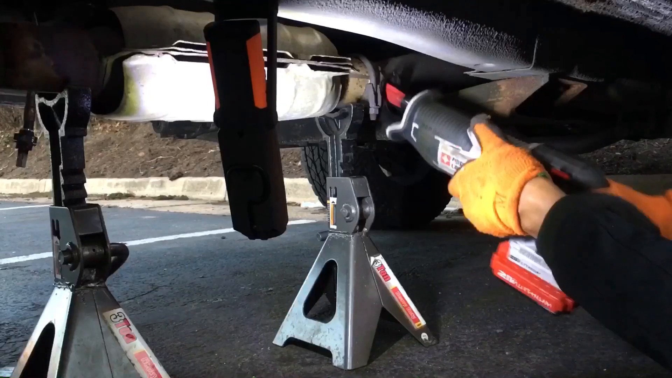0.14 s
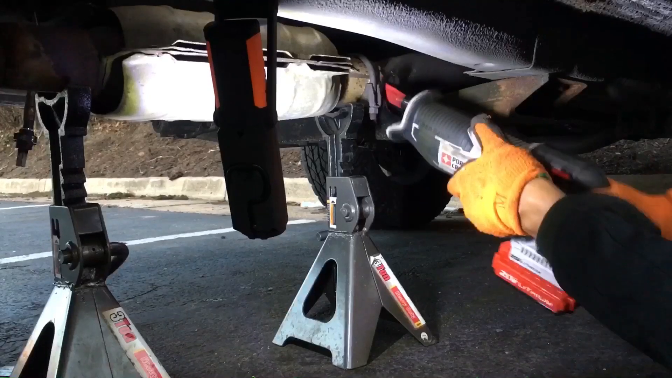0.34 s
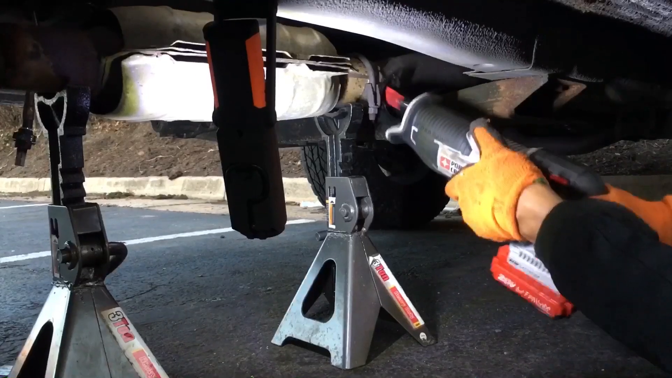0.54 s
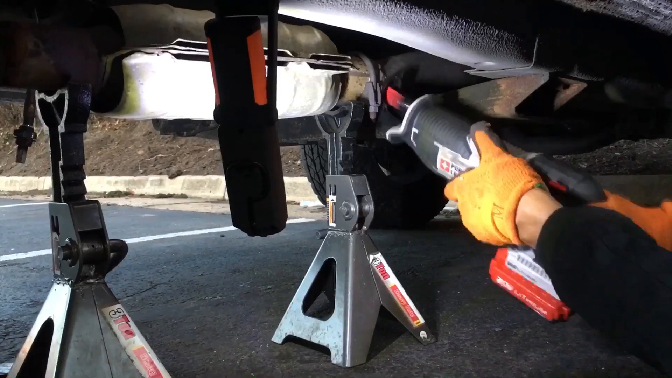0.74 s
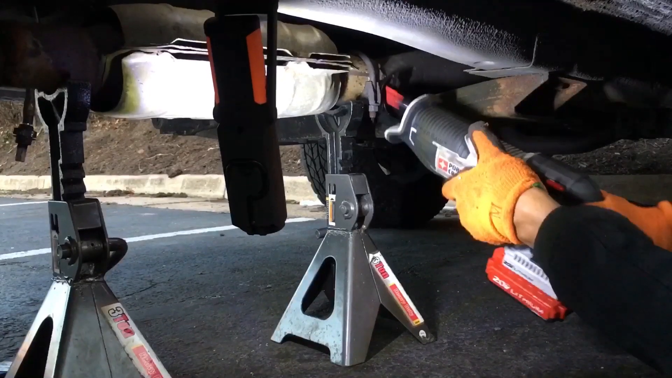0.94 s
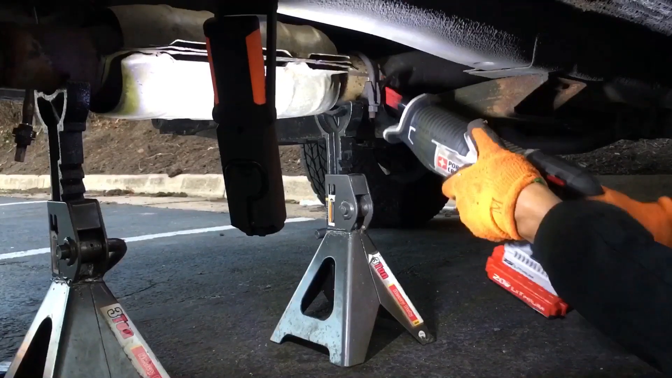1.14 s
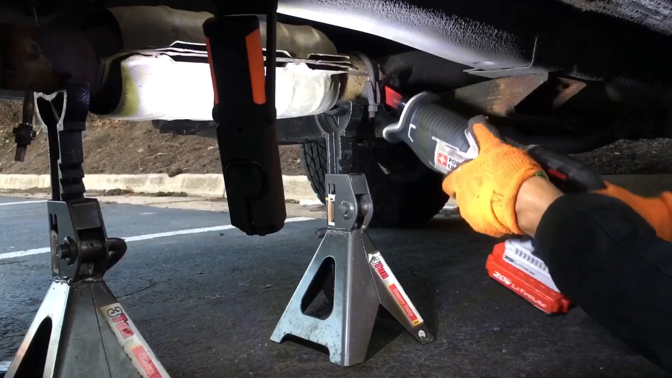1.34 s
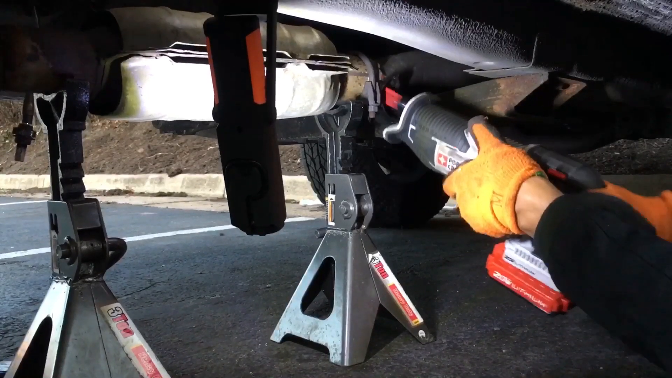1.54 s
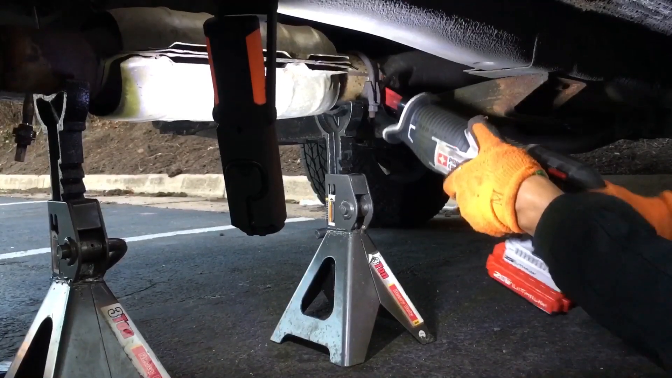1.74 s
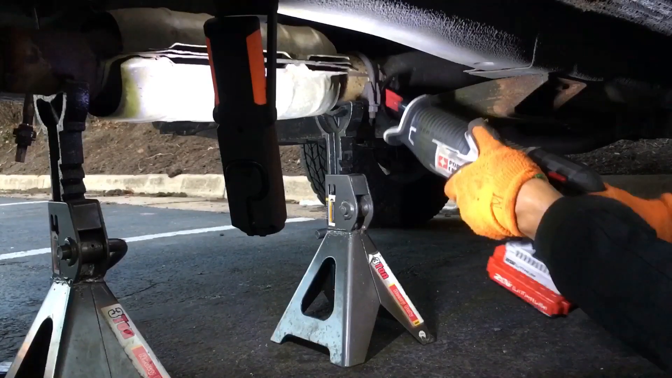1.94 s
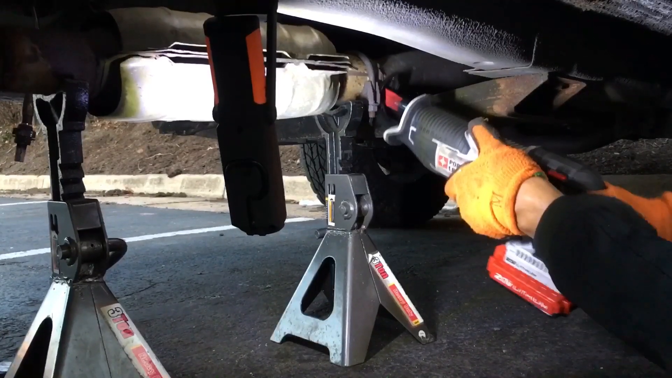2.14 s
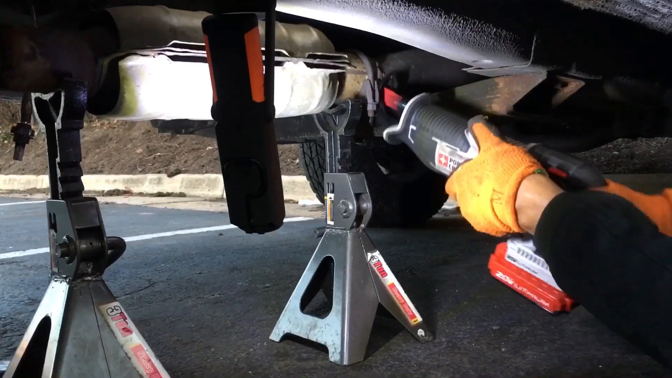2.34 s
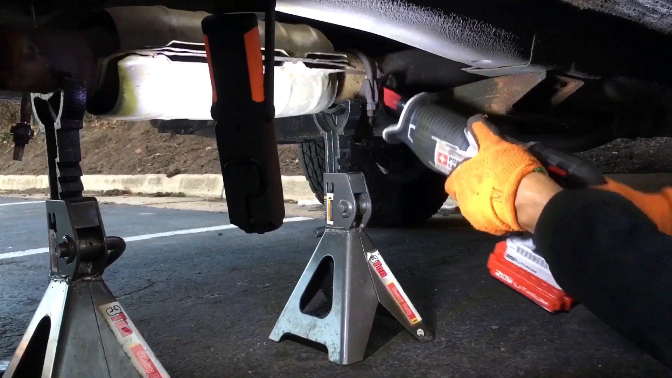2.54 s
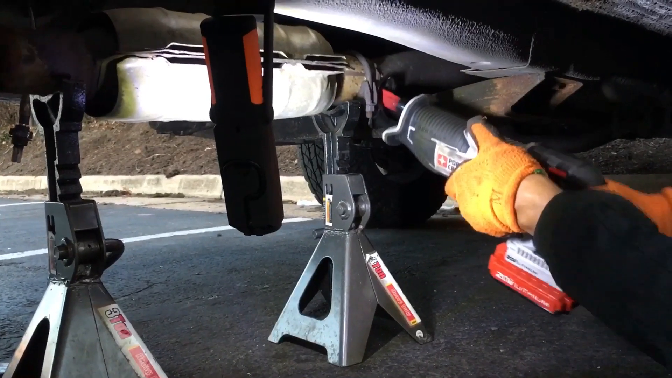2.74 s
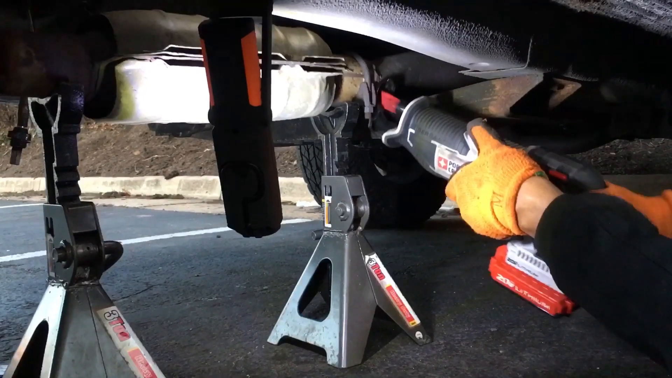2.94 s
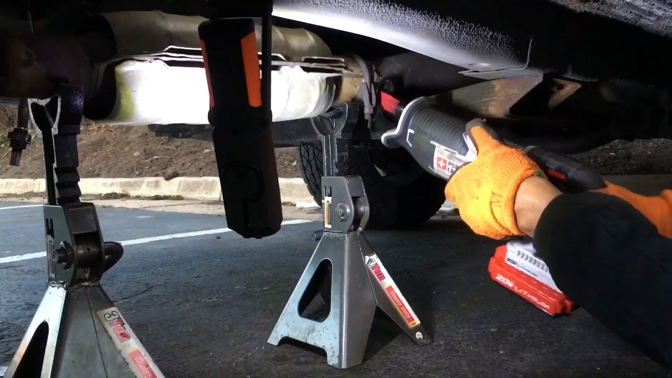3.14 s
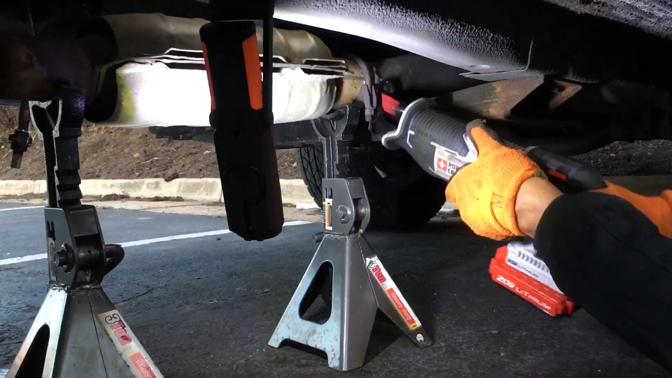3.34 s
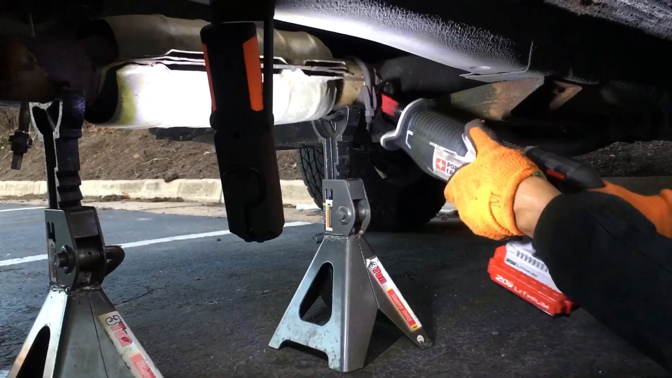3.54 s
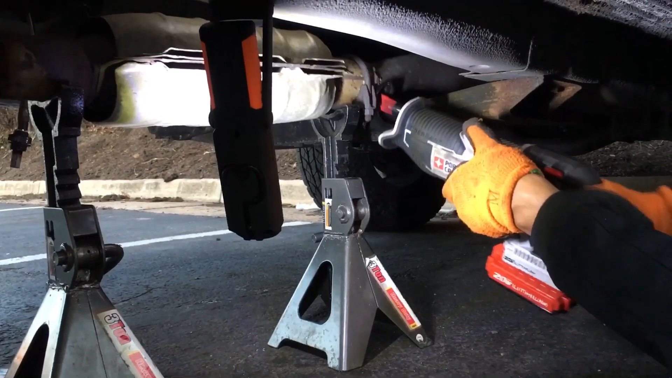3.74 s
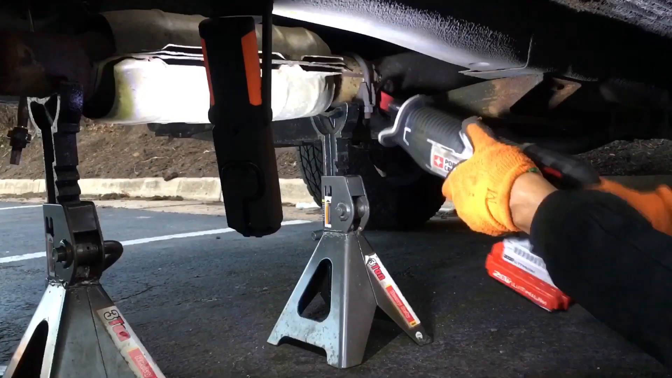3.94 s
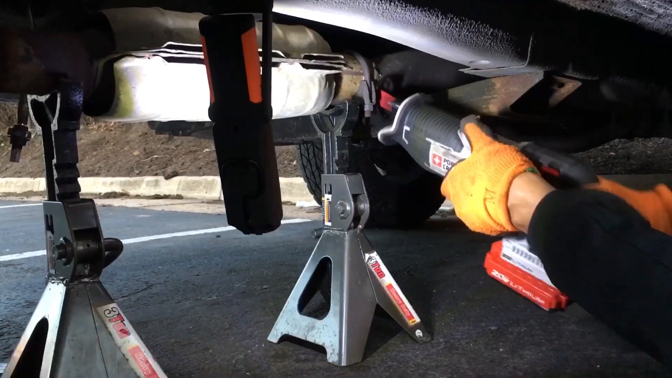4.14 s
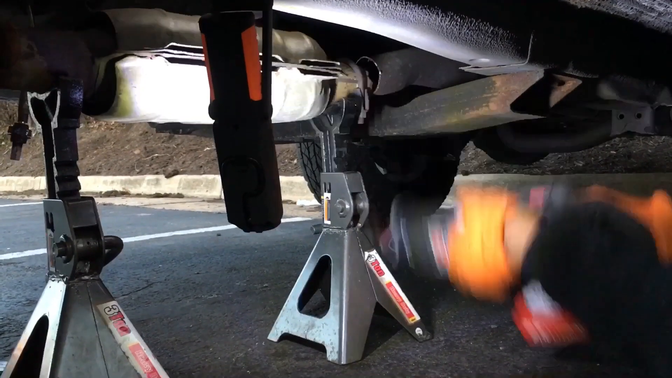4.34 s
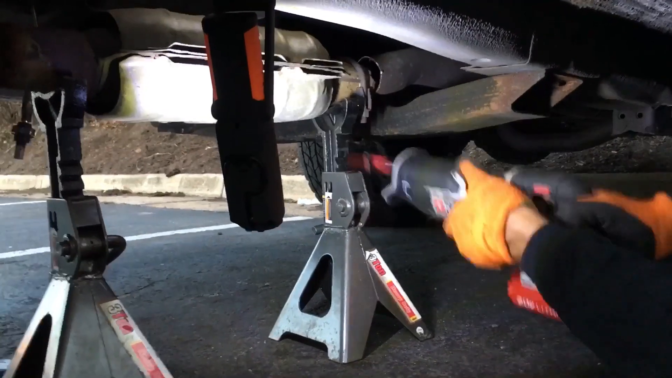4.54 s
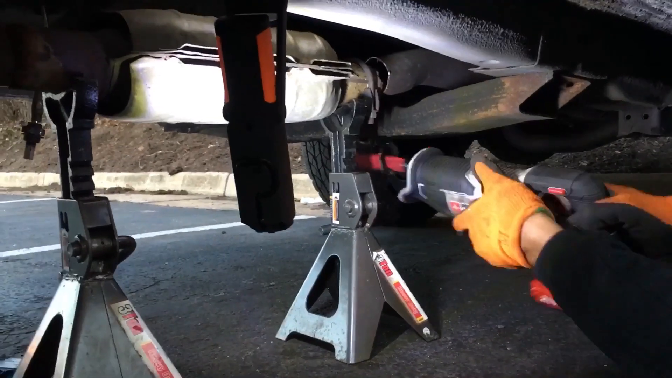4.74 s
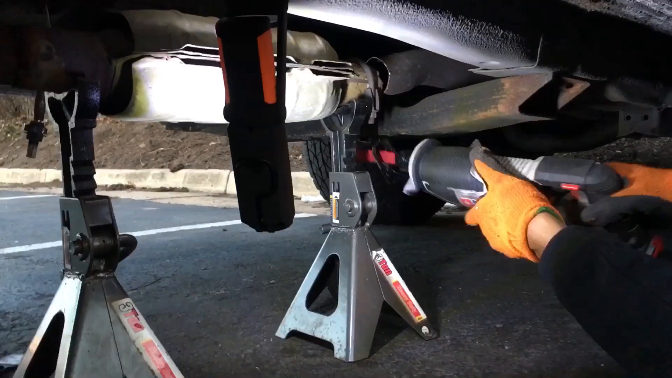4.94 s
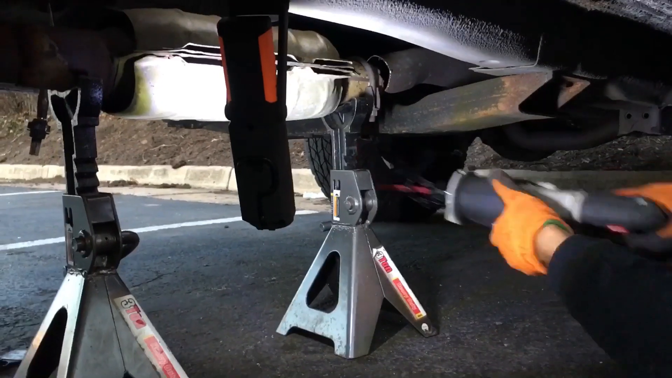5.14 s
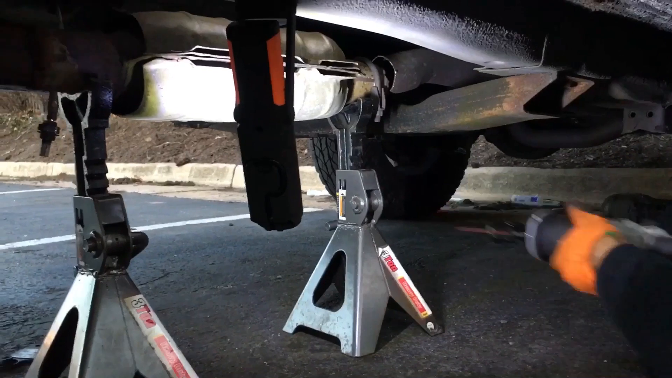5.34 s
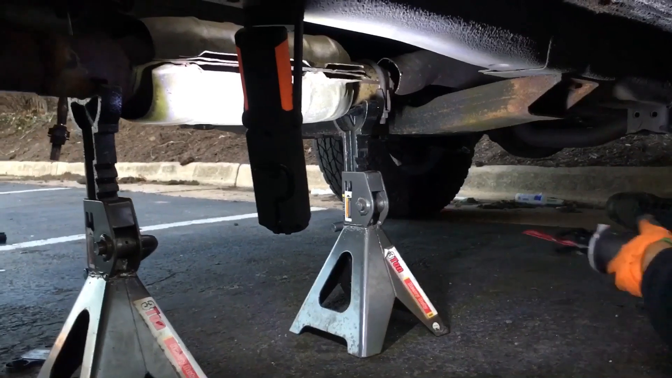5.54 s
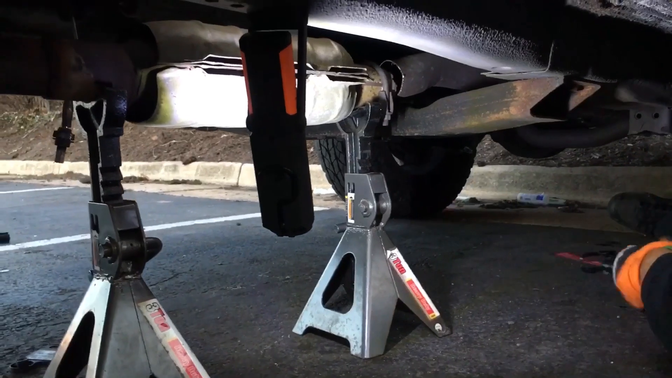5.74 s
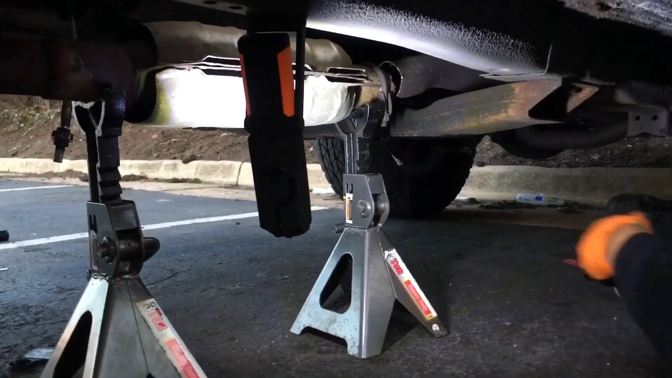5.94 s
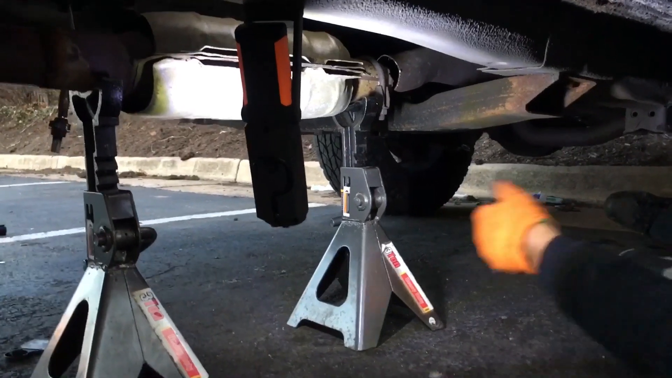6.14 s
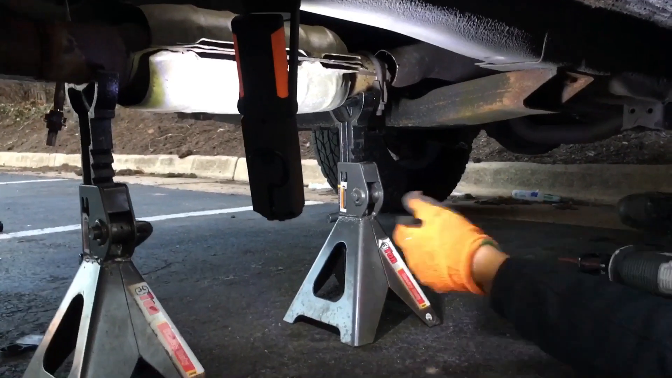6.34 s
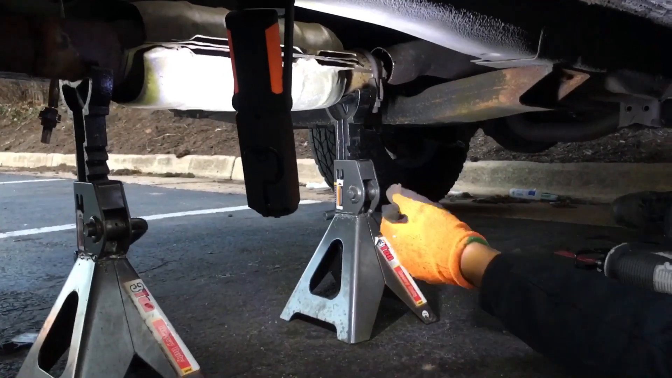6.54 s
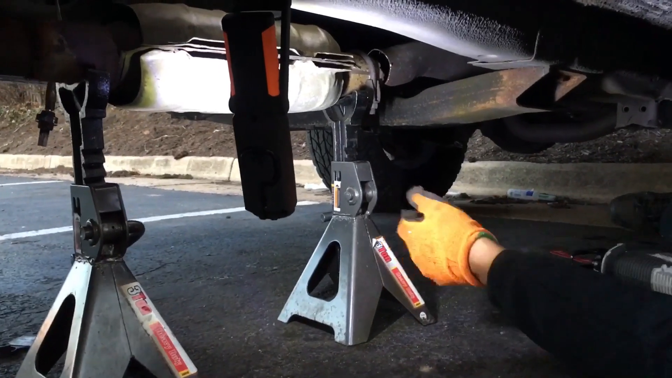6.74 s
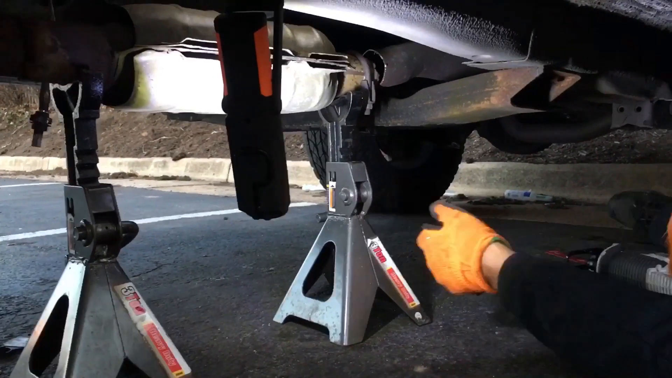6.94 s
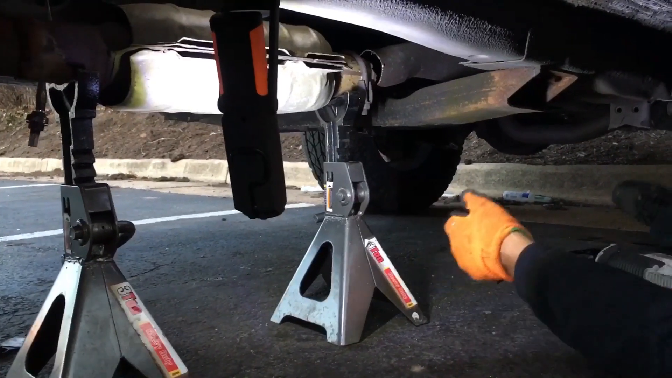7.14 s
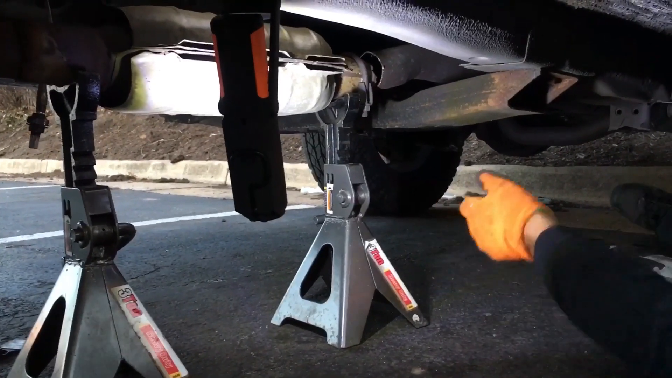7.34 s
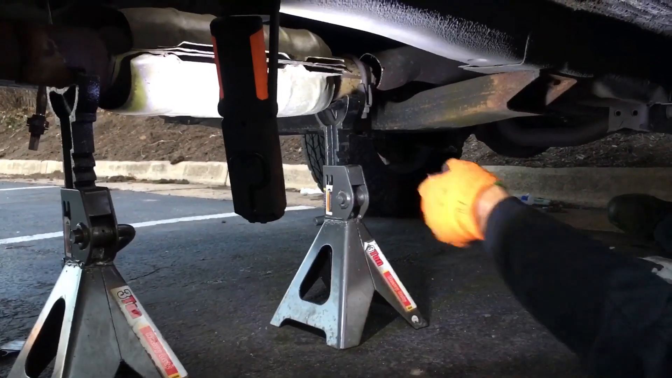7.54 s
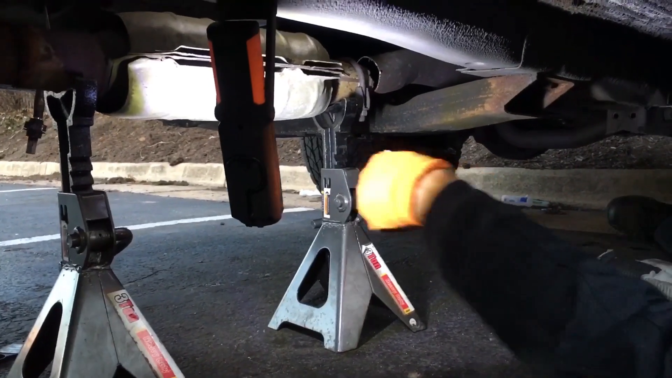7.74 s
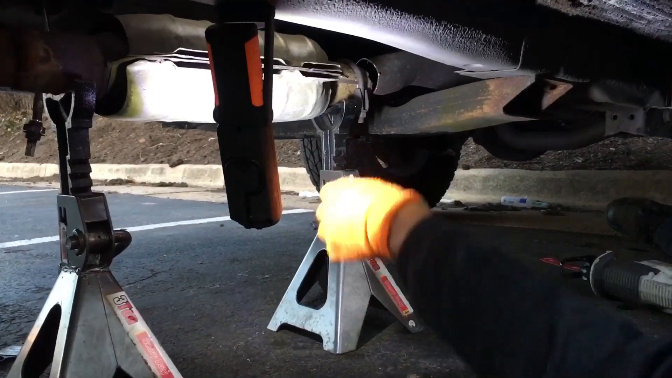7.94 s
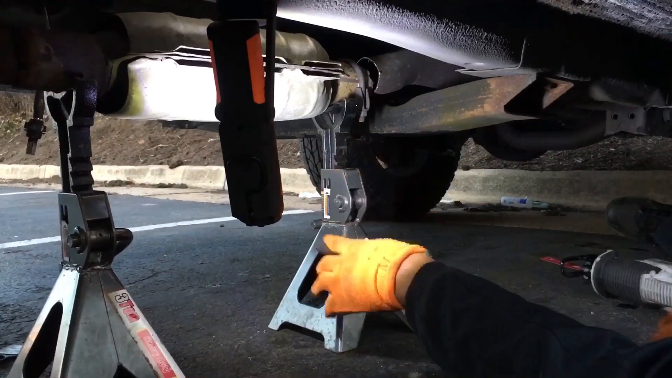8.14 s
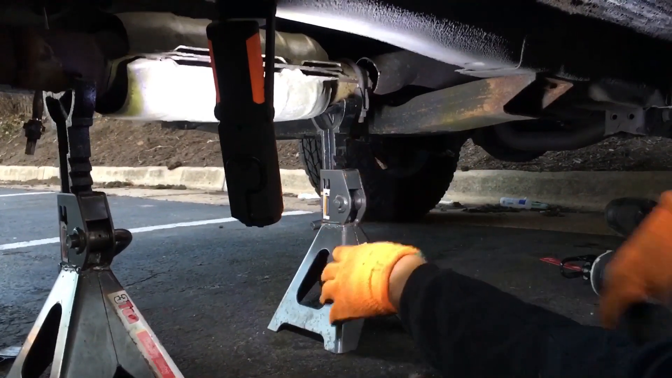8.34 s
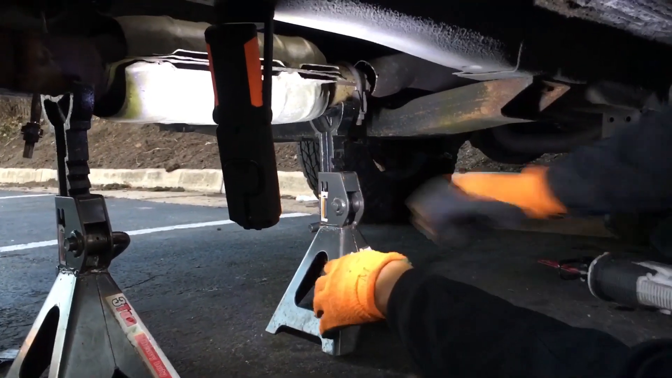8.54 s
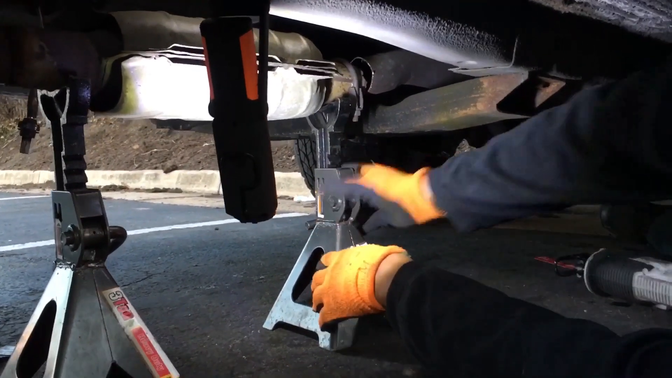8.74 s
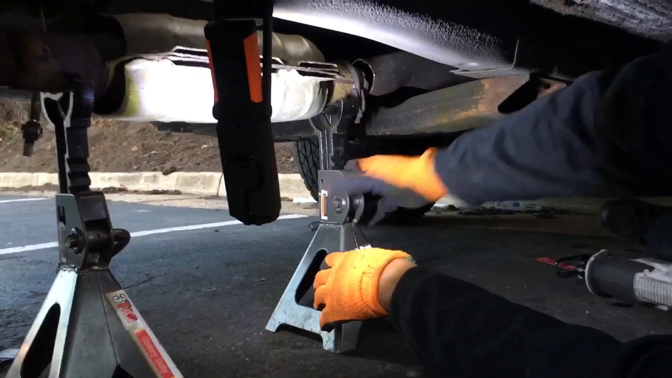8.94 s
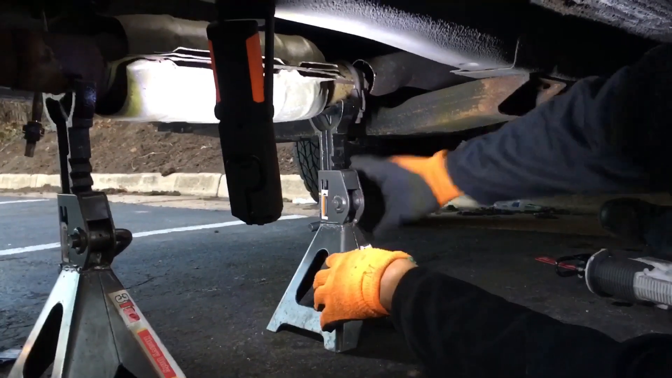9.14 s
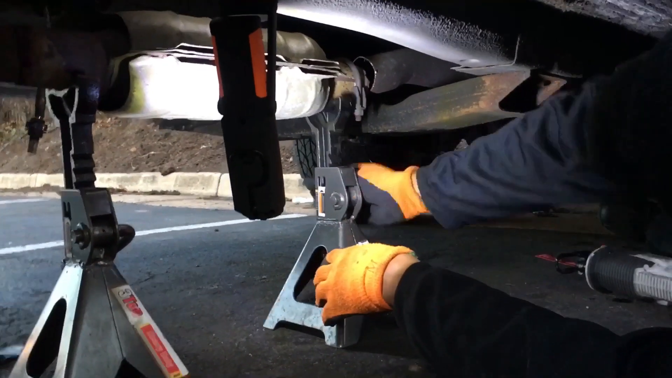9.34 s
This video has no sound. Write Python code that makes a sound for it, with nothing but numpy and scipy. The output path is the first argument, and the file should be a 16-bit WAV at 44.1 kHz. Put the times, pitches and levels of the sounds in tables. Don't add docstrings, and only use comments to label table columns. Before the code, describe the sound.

From 0 to about 4.3 seconds a cordless reciprocating saw cuts a steel pipe close by, around 33 strokes a second: a harsh pulsing rasp, with the pipe wall ringing in wavering mid-high tones. A brief squeal comes near 0.5, and the singing chatter grows fiercer from 2 to 4. At 4.3 the blade breaks through with a knock; the saw runs free with a rattling gear whirr, winding down and stopping at 5.0. Low traffic rumble and a slow engine throb become clearer. Near 5.9 the saw thuds and clatters on asphalt, its blade ringing brightly. From 6 to 9 seconds come sleeve and glove scuffs, a sharp tick at 6.6, smaller ticks, a grit snap at 7.35 and a low bump at 7.8. At 9.3 to 9.5 a steel stand scrapes and clanks several times, the last blow hardest, ringing briefly under the car before the rumble continues.

```python
import sys
import numpy as np
from scipy import signal
from scipy.fft import rfft, irfft, next_fast_len
from scipy.io import wavfile
from scipy.ndimage import uniform_filter1d, map_coordinates

SR = 44100
rng = np.random.default_rng(int(sys.argv[2]) if len(sys.argv) > 2 else 0)


def wav_out(sig):
    wavfile.write(sys.argv[1], SR, np.round(np.clip(np.atleast_2d(sig).T, -1, 1) * 32767).astype(np.int16))


def how_loud(loudness_db):
    steps = np.asarray(loudness_db, float) / 20
    return 10 ** steps


N = 418068
TIME = np.arange(N) / SR


def unit(x):
    return x / np.sqrt(np.mean(x ** 2) + 1e-20)


def along(points, hz):
    f, v = np.transpose(points)
    return np.interp(np.log(hz + 1), np.log(f + 1), v)


def curves(rows):
    s, *cols = np.transpose(rows)
    return [np.interp(TIME, s, c) for c in cols]


def during(rows):
    inside_s = np.minimum(TIME - rows[0][0], rows[-1][0] - TIME)
    return np.clip(inside_s * 100 + 1, 0, 1)


def wobble(rate):
    return map_coordinates(rng.standard_normal(int(N * rate / SR) + 4), [TIME * rate])


def filtered(x, response):
    m = next_fast_len(len(x) + SR // 2)
    return irfft(rfft(x, m) * response(np.fft.rfftfreq(m, 1 / SR)), m)[:len(x)]


def modes(table):
    def response(f):
        return sum((-1) ** k * how_loud(db) * 1j * f * width / (hz * hz - f * f + 1j * f * width)
                   for k, (hz, width, db) in enumerate(table))
    return response


def coloured(x, spectrum):
    return unit(filtered(x, lambda hz: how_loud(along(spectrum, hz))))


def grit(spread_db, rate):
    return unit(rng.standard_normal(N) * how_loud(spread_db * wobble(rate)))


def tone(hz):
    return 2 * np.pi * np.cumsum(hz) / SR


def crank_turns():
    # start_s [s], strokes_per_s [1/s]
    strokes = [(0, 29), (.15, 30.7), (.3, 32), (.7, 33.1), (1.0, 34.4), (1.17, 34), (1.26, 32.6),
               (1.85, 32.09), (2.05, 34.71), (2.5, 33.5), (2.9, 34.55), (3.3, 35.36), (3.62, 34.63),
               (3.85, 29.62), (4.0, 27.64), (4.15, 32.64), (4.35, 31.02)]
    return np.cumsum(curves(strokes)[0]) / SR + 1.15


def shaking(turns):
    # stroke_multiple [1], level_db [dB]
    shake_orders = [(4, -11), (5, -4.5), (6, 0), (7, -12), (8, -13)]
    shake_span = [(0,), (4.33,)]
    # drop when pinned [dB], then sag [dB per s]
    pinned_db, sag_db_per_s = (-5, -2, -5), (-6, -1, -1.5)
    since = TIME - 2
    pinned = np.clip(since / .1, 0, 1)
    second_db, third_db, higher_db = [
        db + pinned * (drop + sag * since) + .8 * wobble(3)
        for db, drop, sag in zip((-28, -35, -30.5), pinned_db, sag_db_per_s)]
    higher = sum(how_loud(db + 2 * wobble(9)) * np.sin(2 * np.pi * k * turns + .5 * wobble(14))
                 for k, db in shake_orders)
    shake = how_loud(second_db - 2.0) * np.sin(4 * np.pi * turns)
    shake += how_loud(third_db - 0.5) * np.sin(6 * np.pi * turns)
    shake += how_loud(higher_db - 1) * higher
    return during(shake_span) * shake


def rasp_sound(press, teeth, bite):
    # pitch_hz [Hz], level_db [dB per Hz]
    scrape_spectrum = [(150, -55), (250, -30.5), (576, -35), (662, -22.5), (1140, -12), (1280, -8.5),
                       (1450, -7.5), (2200, -14), (2860, -15.5), (6140, -24.5), (16000, -31)]
    # pitch_hz [Hz], width_hz [Hz], level_db [dB]
    wall_modes = [(668.4, 26, -2.5), (796, 6.7, -20), (1040, 34, -12.5), (1760, 10, -29.5),
                  (1796, 40, -8.5), (2926, 83, -3.5), (3260, 25, -12.5), (4340, 22.1, -12.5),
                  (5370, 100, -7.5), (5720, 140, 1.5), (6310, 170, 2.5), (8450, 510, -1.5)]
    # pitch_hz [Hz], width_hz [Hz], level_db [dB], fade_start_s [s], fade_db_per_s [dB/s]
    uncut_rings = [(1480, 35, 0, .3, 20), (1150, 30, -1, .8, 8), (2008, 24, 6, .6, 6),
                   (2503, 26, -1, 1.5, 8), (2560, 30, 3, 1.6, 8), (2860, 100, 1, .7, 6)]

    wall = 0
    for hz, width, db in wall_modes:
        drift = how_loud(2 * wobble(6))
        wall = wall + how_loud(db) * drift * unit(filtered(teeth, modes([(hz, width, 0)])))
    rings = 0
    for hz, width, db, s, fade in uncut_rings:
        level = how_loud(db - fade * np.maximum(TIME - s, 0) + 1.3 * wobble(10))
        rings = rings + level * unit(filtered(press * teeth, modes([(hz, width, 0)])))
    loose = how_loud(-14 * (bite - 0.64))
    buzz = unit(filtered(rng.standard_normal(N), modes([(306, 113, -3.5), (653, 260, -2.0)])))

    rasp = coloured(teeth, scrape_spectrum) + how_loud(-16.5) * unit(wall)
    rasp += how_loud(-16.0) * rings + loose * how_loud(-18) * buzz
    treble = filtered(rasp, lambda hz: 1 / (1 + (10000 / (hz + 1)) ** 6))
    rasp -= .09 * np.clip(TIME, 0, 5) * treble
    squeal = np.exp(-((TIME - .5) / 0.05) ** 2) * np.sin(tone(3540 + 45 * wobble(90)))
    return rasp + how_loud(-7 + 3 * wobble(120)) * squeal


def locks(rows, rest_db):
    shapes = []
    for s, hold, db, fade in rows:
        building = 451 * np.maximum(s - TIME, 0)
        fading = fade * np.maximum(TIME - s - hold, 0)
        shapes.append(db - building - fading)
    return np.maximum(np.max(shapes, axis=0), rest_db + 0.88 * wobble(11))


def upper_chatter(u, size, bite, press, teeth):
    phase = tone(1419 + 3 * wobble(12) + 8.5 * wobble(90))
    sung = how_loud(.8 * wobble(150)) * press ** .6 * np.sin(phase)
    upper = unit(filtered(sung, modes([(1421, 250, 0)])))
    neighbours = modes([(1492, 35, 0), (1365, 40, -4), (1550, 50, -4),
                        (1673, 20, -1), (1740, 20, -1), (1850, 60, -5)])
    upper += .5 * unit(filtered(teeth, neighbours))
    flare = bite * size * (.07 + np.exp(-((u - .17) / .12) ** 2))
    flare = flare * how_loud(1.2 * wobble(150) + 1.5 * wobble(20))
    octave = flare * np.sin(2 * phase + .5 * wobble(200))
    upper += how_loud(-9) * unit(filtered(octave, modes([(2843, 350, 0)])))
    sum_tone = np.sin(phase + tone(1145 + 35 * wobble(30)) + .6 * wobble(200))
    upper += how_loud(-15) * unit(flare * sum_tone)
    spray = flare * rng.standard_normal(N)
    return upper + how_loud(-14) * unit(filtered(spray, modes([(2430, 130, -1), (3130, 45, 2), (3410, 80, 0)])))


def lower_chatter(u, size, bite):
    swing = 1.25 - bite ** .4 + 2.6 * size * np.exp(-((u - .25) / .17) ** 2)
    sung = swing * how_loud(1.5 * wobble(100)) * np.sin(tone(1150 + 25 * wobble(80)))
    return unit(filtered(sung, modes([(1150, 170, 0)])))


def cutting(turns):
    # start_s [s], rasp_db [dB], bite [0-1, how unevenly a stroke cuts]
    feed = [
        (0, -23.5, 0.45),
        (1.9, -24.5, 0.45),
        (2.3, -26.5, 0.62),
        (3.1, -29, 0.59),
        (3.4, -28, 0.84),
        (4.03, -28, 0.84),
        (4.06, -31, .55),
        (4.335, -33.5, 0.05),
        (4.35, -64, .7),
    ]
    # start_s [s], hold_s [s], level_db [dB], fade_db_per_s [dB/s]
    upper_pushes = [(.12, 0.017, -33.5, 100), (.24, 0.012, -17, 49), (.88, 0.015, -16, 151.5),
                    (1.0, 0.024, -18, 29.5), (1.29, 0.015, -19, 58.5), (1.52, 0.93, -17, 39.5),
                    (2.02, .2, -12.5, 20.5), (2.22, .15, -11, 46.5), (2.39, 0.06, -7, 60),
                    (2.668, 0.092, -8, 249), (2.958, 0.018, -5.5, 205.5), (3.129, 0.012, -5, 73),
                    (3.25, 0.12, -11.5, 17), (3.36, 0.44, -10, 248), (4.043, 0.077, -11, 94),
                    (4.18, 0.12, -16, 900)]
    lower_pushes = [(0, .06, -22.5, 201), (.17, 0.021, -18, 301.5), (.32, 0.066, -23, 53.5),
                    (.45, 0.17, -23.5, 29.5), (1.05, 0.17, -20, 50.5), (1.22, 0.039, -17, 65),
                    (2.02, 0.011, -23, 8), (2.63, 0.0085, -26, 50), (3.4, 0.5, -22.5, 51),
                    (3.8, .22, -13.5, 300), (4.06, .27, -25, 900)]
    cut_span = [(0,), (4.35,)]
    upper_rest_db, lower_rest_db = -26, -28

    u = turns % 1
    size = how_loud(.7 * rng.standard_normal(int(turns[-1]) + 1))[turns.astype(int)]
    return_drag = .3 * np.exp(-((u - .45) / .1) ** 2)
    stroke = (1 - np.exp(-u / .03)) * (np.exp(-u / .33) + return_drag)
    feed_db, bite = curves(feed)
    bite = np.clip(bite, 0, 1)
    upper_db = locks(upper_pushes, upper_rest_db)
    lower_db = locks(lower_pushes, lower_rest_db)
    rasp_db = feed_db + 0.14 * (upper_db - upper_rest_db) + 1.01 * wobble(8.15)
    press = 1 - bite + bite * size * stroke / np.mean(stroke)
    press = press / np.sqrt(uniform_filter1d(press ** 2, size=4000))
    teeth = press ** 0.36 * grit(spread_db=1.5, rate=460)

    cut = how_loud(rasp_db + 6.5) * rasp_sound(press, teeth, bite)
    cut += how_loud(upper_db - 6) * upper_chatter(u, size, bite, press, teeth)
    cut += how_loud(lower_db - 3.5) * lower_chatter(u, size, bite)
    return during(cut_span) * cut


def traffic():
    # pitch_hz [Hz], level_db [dB per Hz]
    rumble = [(20, -19.5), (64, -0.5), (116, -11.5), (141, -14.5), (216, -24), (271, -30.5), (307, -26),
              (400, -41.5), (520, -61), (880, -120)]
    hiss = [(120, -4.5), (200, -1.5), (254, -8.5), (465, -11), (836, -9.5), (1350, -14.5), (1740, -14.5),
            (5000, -35.5), (16000, -50.5)]
    # start_s [s], peak_db [dB], half_length_s [s], pitch_hz [Hz]
    thuds = [
        (7.772, -40, 0.0066, 400),
        (4.334, -30, 0.005, 330),
        (5.868, -26.5, 0.0053, 310),
        (4.9, -22, .02, 58),
        (6.628, -28, 0.0051, 840),
        (7.77, -17.5, 0.0014, 120),
        (10, -24, 0.078, 59.7),
        (9.388, -26, 0.028, 58),
        (9.352, -30, 0.016, 293),
    ]
    # start_s [s], pitch_hz [Hz], level_db [dB]
    hum = [(7.9, 290, -72), (8.1, 300, -54), (8.5, 311.4, -63), (8.7, 312, -56), (8.9, 296, -49.5),
           (9.0, 276, -84)]
    sing = [(7.74, 2280, -53), (7.85, 2290, -57.5), (8.1, 2230, -69)]
    squeak = [(8.43, 11900, -95), (8.45, 12600, -73), (8.48, 11950, -76), (8.52, 12800, -81),
              (8.56, 11700, -70), (8.61, 10700, -94)]

    duck_db = -5 * np.clip((5.05 - TIME) / .12, 0, 1)
    out = how_loud(-32 + duck_db + 2.2 * wobble(8)) * coloured(rng.standard_normal(N), rumble)
    out += how_loud(-50 + duck_db + 1.1 * wobble(6)) * coloured(rng.standard_normal(N), hiss)
    throbs = [(5.218 + k * .7045 - .019 * (-1) ** k, -21.5, 0.066, 56.9) for k in range(7)]
    for s, db, half, hz in throbs + thuds:
        late = TIME - s
        out += how_loud(db) * np.exp(-(late / half) ** 2) * np.sin(2 * np.pi * hz * late)
    for rows in (hum, sing, squeak):
        hz, db = curves(rows)
        out += during(rows) * how_loud(db + 3 * wobble(40)) * np.sin(tone(hz) + .6 * wobble(60))
    return out


def free_running():
    # start_s [s], level_db [dB]
    free_level = [(4.3, -18), (4.414, -24), (4.432, -19), (4.466, -23), (4.608, -17), (4.93, -18),
                  (4.958, -17), (5.004, -62), (5.03, -60.5)]
    # pitch_hz [Hz], level_db [dB per Hz]
    gear_spectrum = [(120, -52), (200, -22), (311, -12), (448, -11.5), (1100, 0.5), (1940, -5.5),
                     (2420, -0.5), (2650, -10.5), (2960, -5), (7410, -18), (8420, -21), (10300, -22.5),
                     (16000, -23)]
    # pitch_hz [Hz], width_hz [Hz], level_db [dB]
    housing = [(1090, 130, -17.5), (1420, 18, -5), (1550, 48, 1), (2270, 43, -1), (2840, 130, -5),
               (3680, 60, 10), (8470, 380, -0.5), (13300, 250, -1.5)]

    late = TIME - 4.5985
    knocks_per_s, slowing_per_s2 = 93.05, 168.6
    gear = 500 + knocks_per_s * late - slowing_per_s2 / 2 * np.clip(late, 0, .5) ** 2
    size = how_loud(1.2 * rng.standard_normal(1000))[gear.astype(int)]
    u = gear % 1
    knocks = .4 + 1.4 * size * (1 - np.exp(-u / .03)) * np.exp(-u / .3)
    rattle = knocks * grit(spread_db=1, rate=280)
    free = coloured(rattle, gear_spectrum) + how_loud(-9.5) * unit(filtered(rattle, modes(housing)))
    whirr = sum(np.sin(k * np.pi * gear) for k in (5, 6, 7))
    free += how_loud(-22 - 60 * np.maximum(late, 0)) * whirr
    return during(free_level) * how_loud(curves(free_level)[0] - 7.0) * free


def ticks():
    # start_s [s], peak_db [dB], low_knock_db [dB], treble_db [dB]
    saw_knocks = [(4.325, -17.5, 10, -17.5), (4.4296, -14.5, 0, -30), (4.9512, -12, -2.5, -21),
                  (5.863, -14, -2.5, -12.5), (5.872, -18.5, 5, -18.5), (5.8845, -21, -8, -17),
                  (5.892, -27.5, -3, -13), (5.909, -30.5, -3.5, -15), (5.916, -26, -4.5, -15),
                  (5.931, -30, -4.5, -12), (5.9, -24, -4, -21), (5.921, -27, 0.5, -8),
                  (5.94, -30.5, -7, -13), (5.9676, -35, 0, -17.5), (6.007, -37.5, 6, -15.5),
                  (6.0244, -40.5, 13, -7), (6.045, -47, 4, -12.5), (6.06, -43, 9, -28),
                  (6.1494, -50, -5, 1.5)]
    # the same columns, then centre_hz [Hz]
    part_ticks = [(5.397, -43.5, -4, -22.5, 3100), (5.5235, -42, 2, -28.5, 3100),
                  (6.4388, -43, 6, -5, 3500), (6.619, -22.5, 6, -8, 2960), (6.674, -43, 11, -10, 3000),
                  (6.75, -29.5, -7, -6, 3100), (6.831, -44, 6, -12, 2500), (6.8897, -38.5, -12, -18, 3400),
                  (6.916, -45.5, -10, -16, 3300), (6.972, -26, -3.5, -23, 2700),
                  (7.4908, -46.5, -12, -18, 3200), (7.6056, -43.5, 5, -19.5, 3500),
                  (7.7668, -41, 9.5, -25.5, 3100), (8.7806, -47.5, -7, -14, 3000),
                  (8.951, -39.5, 3, -23, 3500), (9.0384, -35, 1, -24.5, 2300),
                  (9.0949, -36.5, 2, -14, 3200), (9.26, -39, 0, -15, 3000)]

    out, t = np.zeros(N + SR), TIME[:SR // 5]
    for s, db, knock_db, air_db, *own_hz in saw_knocks + part_ticks:
        hz = (own_hz or [3100])[0]
        t60 = 0.035 - 0.00069 * max(db + 35, 0)
        burst = rng.standard_normal((3, len(t))) * how_loud(-60 * t / max(t60, .005)) * (1 - np.exp(-t * 450))
        rattle = how_loud(-23.0 - 60 * t / 0.11) * (1 - np.exp(-t / 0.0028))
        burst += rattle * rng.standard_normal((3, len(t)))
        for noise, centre, level in zip(burst, (hz, 1210, 9000), (0, knock_db, air_db)):
            band = modes([(centre, .75 * centre + 300, 0)])
            part = filtered(noise, lambda f: band(f) ** 3)
            out[round(s * SR):][:len(t)] += how_loud(db + level - 1.5) * part / abs(part).max()
    return out[:N]


def struck(hits, table, gain_db):
    out, t = np.zeros(N + SR), TIME[:SR // 3]
    for s, db, *crack_db in hits:
        ring = sum(how_loud(level + rng.normal(0, 3.4) - 60 * t / t60) * np.sin(2 * np.pi * hz * t)
                   for hz, level, t60 in table)
        blow = ring * (1 - np.exp(-t / 0.00015))
        if crack_db:
            noise = filtered(rng.standard_normal(len(t)), lambda f: modes([(3000, 4500, 0)])(f) ** 2)
            blow += how_loud(crack_db[0] - 60 * t / 0.079) * noise
        out[round(s * SR):][:len(t)] += how_loud(db + gain_db) * blow
    return out[:N]


def steel_rings():
    # pitch_hz [Hz], level_db [dB], t60_s [s]
    exhaust = [(665, -4, .9), (680, -8, .6), (1690, -9, .8), (1712, -9, .6)]
    blade = [(8200, -2.5, 0.02), (8380, 1.5, 0.022), (8650, 4, 0.02), (8480, -25, 0.14)]
    tip = [(12900, -4, .025), (13300, 0.5, .04), (13700, 1, .025), (15200, -3.5, .03), (15500, -3, .03)]
    # start_s [s], peak_db [dB]
    blade_hits = [
        (5.8706, -18.5),
        (5.9, -36),
        (5.9254, -28.5),
        (6.0307, -41),
    ]
    tip_hits = [
        (5.8716, -40),
        (5.8965, -34),
        (5.9254, -31.5),
        (6.0295, -48),
    ]
    out = struck([(4.95, -46)], exhaust, gain_db=0)
    return out + struck(blade_hits, blade, gain_db=-6) + struck(tip_hits, tip, gain_db=-4)


def cloth():
    # start_s [s], level_db [dB], half_length_s [s], centre_hz [Hz]
    scuffs = [(5.114, -57, 0.38, 3500), (5.219, -56, 0.082, 7970), (5.453, -59.5, 0.2, 3530),
              (5.831, -55, 0.037, 5450), (6.052, -46.5, 0.032, 2000), (6.219, -55, 0.024, 3000),
              (6.263, -48.5, 0.034, 7460), (6.329, -52.5, 0.033, 6000), (6.527, -65.5, 0.24, 4000),
              (6.884, -65, .08, 5000), (7.195, -49.5, 0.08, 4000), (7.283, -43, 0.1, 1514),
              (7.409, -54, 0.015, 2500), (7.679, -52, 0.089, 3870), (7.717, -48.5, 0.099, 1500),
              (7.798, -53, .05, 2300), (8.962, -52.5, 0.025, 5000), (9.017, -60, .03, 8040),
              (9.102, -49, 0.014, 6000)]
    out = np.zeros(N + SR)
    t = np.arange(-SR // 3, SR // 3) / SR
    for s, db, half, hz in scuffs:
        clumps = np.repeat(rng.standard_normal(len(t) // 100 + 1), 100)[:len(t)]
        grains = rng.standard_normal(len(t)) * how_loud(2.1 * clumps)
        band = modes([(hz, 2.14 * hz, 0)])
        scuff = unit(filtered(grains, lambda f: band(f) ** 4))
        out[round(s * SR) - SR // 3:][:len(t)] += how_loud(db) * np.exp(-(t / half) ** 2) * scuff
    grit_clicks = (rng.random(N) < 10 / SR) * how_loud(-50 + 4 * rng.standard_normal(N))
    return out[:N] + filtered(grit_clicks, modes([(5000, 4500, 2)]))


def snaps():
    # start_s [s], peak_db [dB], centre_hz [Hz]
    grit_snaps = [(6.5620, -50, 6900), (6.837, -42, 8000), (7.3482, -26, 7000), (7.5126, -46.5, 9000),
                  (7.5869, -49, 5000), (7.788, -48, 7000), (8.1177, -52, 4000), (8.1726, -52.5, 10000),
                  (8.2733, -44, 4500), (8.3038, -49, 4500), (8.325, -54, 5000), (8.3542, -56, 3400),
                  (8.3716, -55, 5000), (8.388, -53.5, 5000), (8.4664, -46.5, 6000), (9.1698, -52, 4000)]
    out, t = np.zeros(N + SR), TIME[:SR // 40]
    for s, db, hz in grit_snaps:
        noise = rng.standard_normal(len(t)) * how_loud(-60 * t / .012)
        click = filtered(noise, lambda f: modes([(hz, 1.5 * hz, 0)])(f) ** 2)
        out[round(s * SR):][:len(t)] += how_loud(db) * click / abs(click).max()
    return out[:N]


def stand():
    # start_s [s], level_db [dB]
    grind_level = [(9.28, -46), (9.286, -37), (9.345, -27), (9.36, -28.5), (9.37, -28), (9.428, -42.5),
                   (9.436, -20.5), (9.46, -23), (9.48, -34.5)]
    # start_s [s], peak_db [dB], crack_db [dB]
    clanks = [
        (9.286, -23, -4),
        (9.303, -19.5, -5),
        (9.334, -10, -2),
        (9.346, -11, -5),
        (9.356, -9.5, -6.5),
        (9.374, -12, -0.5),
        (9.431, -17.5, 3),
        (9.4345, -4.5, -4.5),
        (9.454, -13.5, -3),
    ]
    # pitch_hz [Hz], level_db [dB], t60_s [s]
    stand_modes = [(330, -6.5, 0.05), (940, -4, 0.22), (1480, -2.5, 0.13), (1830, 1, 0.12),
                   (2080, -3, 0.09), (2830, -11.5, 0.12), (3110, -12, 0.16), (3680, -5.5, 0.12),
                   (3950, -10, .06), (4560, -12, 0.073), (5700, -14, .1), (6993, -21, 0.16),
                   (7950, -22.5, .085), (9600, -31.5, .12)]
    leg = [(1835, -1, .17), (2740, -11, 0.23)]

    grind = grit(spread_db=3, rate=250)
    rung = filtered(grind, modes([(hz, 120 + 0.036 * hz, db) for hz, db, t60 in stand_modes]))
    rough = filtered(grind, lambda f: modes([(2500, 6000, 0)])(f) ** 3)
    scrape = unit(rung) + how_loud(-2.5) * unit(rough)
    out = during(grind_level) * how_loud(curves(grind_level)[0] - 0.5) * scrape
    out += struck(clanks, stand_modes, gain_db=-17.5)
    return out + struck([(9.4345, -13.5)], leg, gain_db=-0.5)


def underside(x):
    # pitch_hz [Hz], t60_s [s]
    echo_t60 = [(200, 0.31), (2000, 0.12), (10000, 0.066)]
    hz, t, z = signal.stft(rng.standard_normal(SR // 3), SR, nperseg=256)
    fade = how_loud(-60 * t / along(echo_t60, hz)[:, None])
    tail = signal.istft(z * fade, SR, nperseg=256)[1]
    return signal.fftconvolve(np.pad(x, (200, 0)), tail / np.linalg.norm(tail))[:N]


def scene():
    turns = crank_turns()
    saw = shaking(turns) + cutting(turns) + free_running()
    near = saw + ticks() + steel_rings() + stand()
    return (near + how_loud(-10.0) * underside(near) + cloth() + snaps() + traffic())[None]


def band_limit(x):
    return signal.sosfilt(signal.butter(12, 16830, fs=SR, output="sos"), x)


def record(dry):
    def microphone(hz):
        dip = 1 - 0.39 * np.exp(-((hz - 10500) / 400) ** 2)
        bass_cut = 1 / np.sqrt(1 + (36 / (hz + 1)) ** 8)
        return dip * (hz < 15830) * bass_cut
    hiss = how_loud(-74 + 2.5 * wobble(7)) * rng.standard_normal(N)
    rounded = dry[0] / (1 + np.abs(dry[0]) ** 8) ** (1 / 8)
    return band_limit(filtered(hiss + rounded, microphone)[None])


dry = scene()
out = record(dry)
wav_out(out)
```